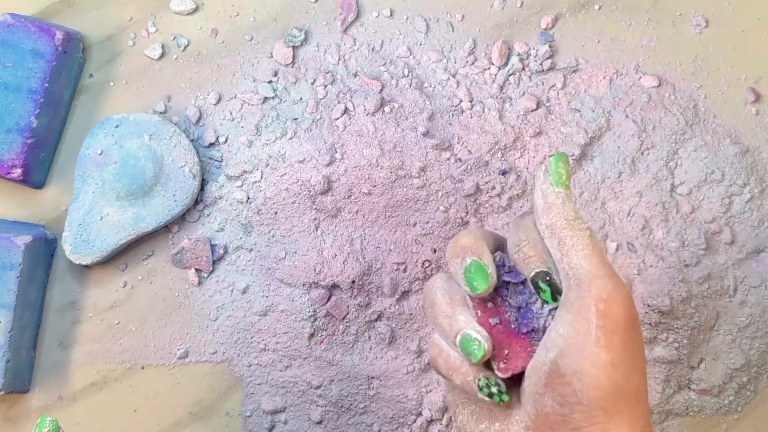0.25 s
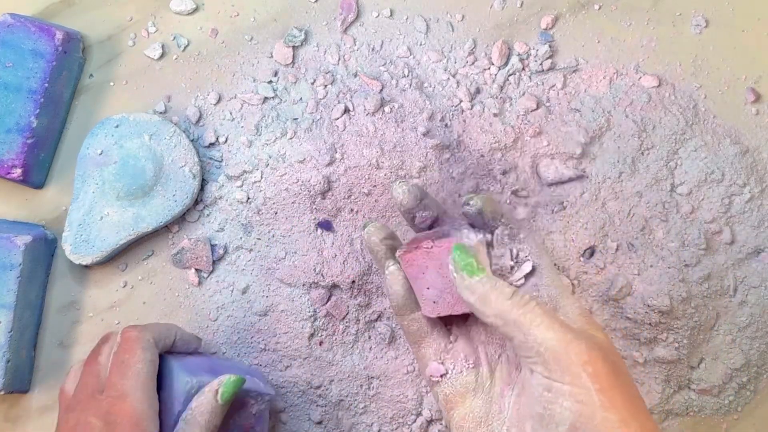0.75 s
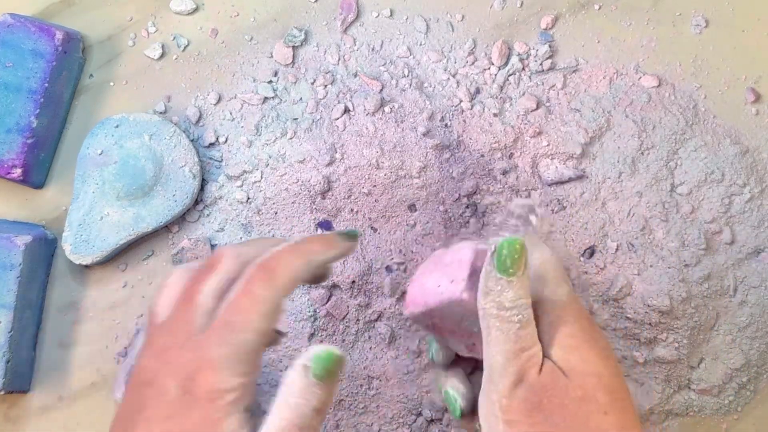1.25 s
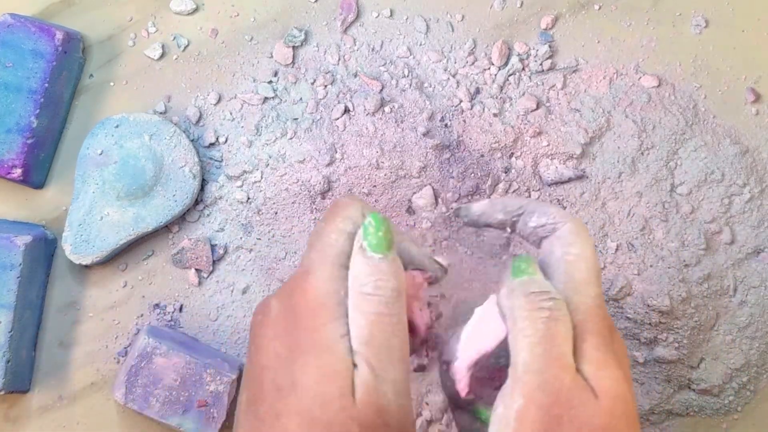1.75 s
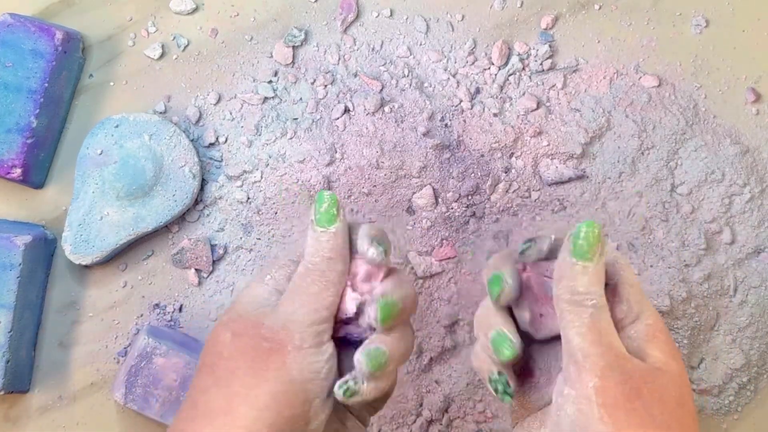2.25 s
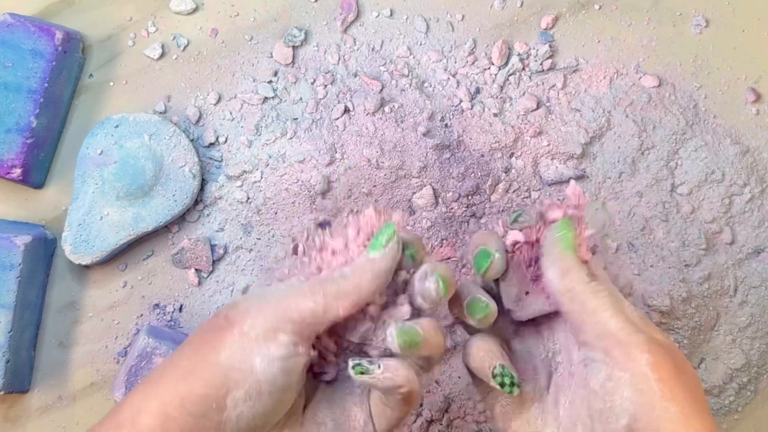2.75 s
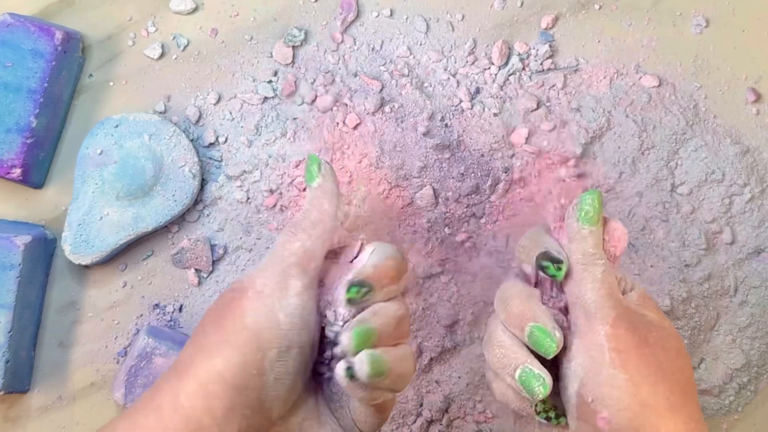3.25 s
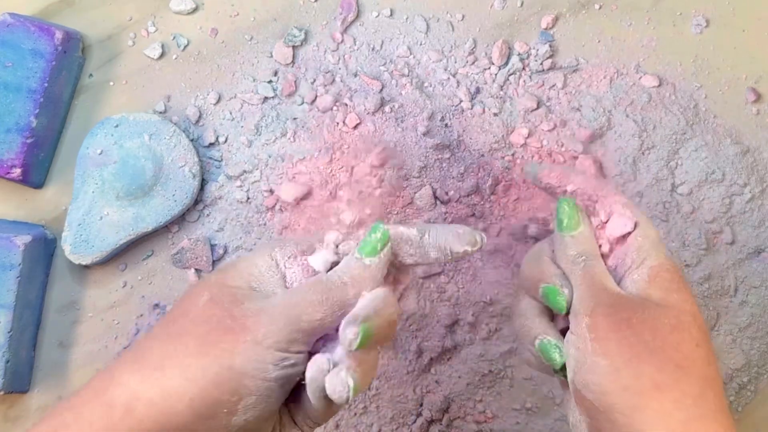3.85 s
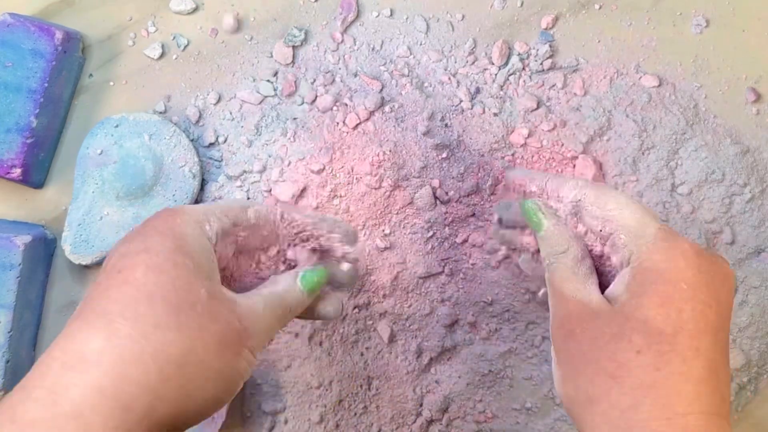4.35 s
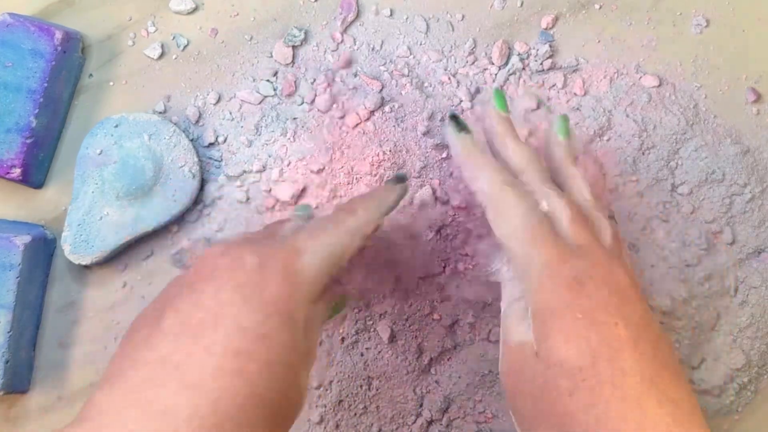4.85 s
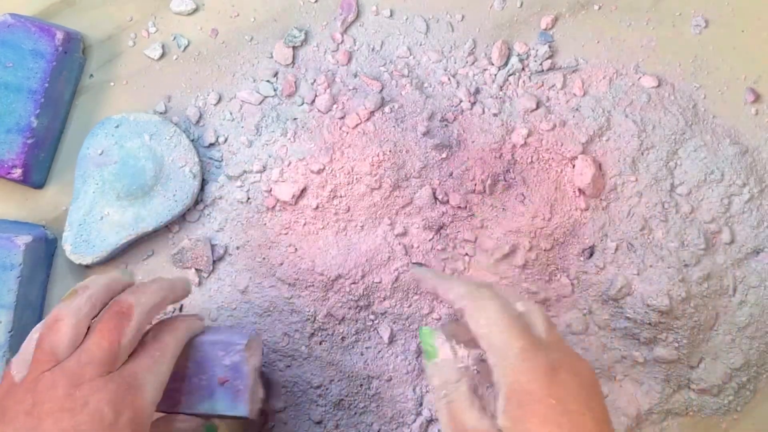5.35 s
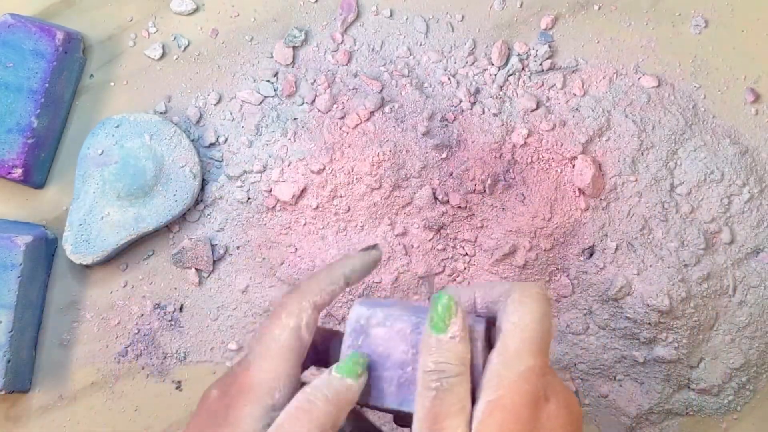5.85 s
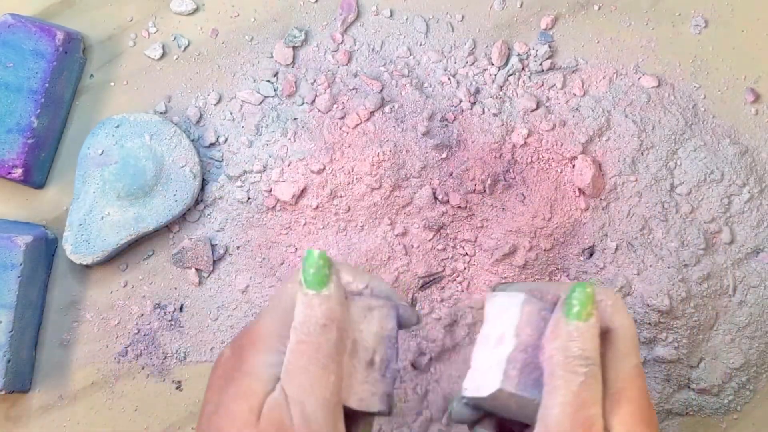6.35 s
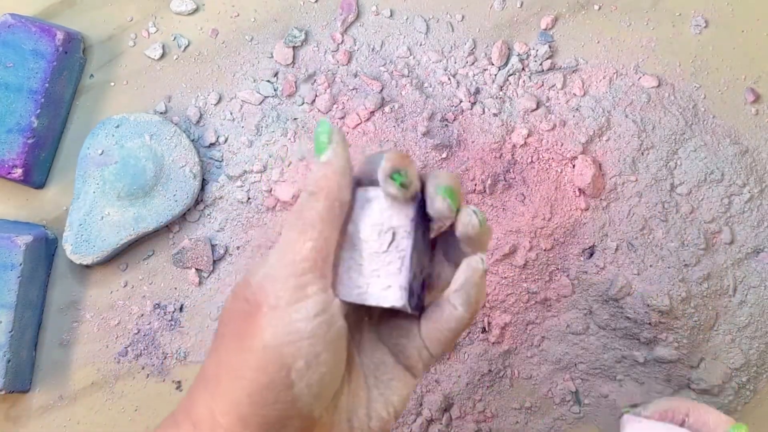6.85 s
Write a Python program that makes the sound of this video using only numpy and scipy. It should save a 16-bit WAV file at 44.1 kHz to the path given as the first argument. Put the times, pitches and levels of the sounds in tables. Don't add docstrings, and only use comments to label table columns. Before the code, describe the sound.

Close, dry stereo sound of hands crushing chalk over powder on a thin wooden table. At the very start a grip crackles briefly, then sparse ticks and soft sifting; a lump snaps near 0.7 s with small table knocks and a faint drag. Around 1.1 s a block drops, bounces in a quick rattle and scrapes briefly. From 1.7 s hard snaps burst out, then dense crunching clusters at 2.3-2.5 and 2.9-3.2 s, with gritty hiss and hollow knocks. Strong cracks continue from 3.5 to 4.0 s, thinning into fine pops and ticks until 5 s. Fresh blocks tap and squeak at 5.2-5.8 s, with small chips near 6.1 s. At 6.2 s one splits with a loud, bright, woody crack; soft slides and powdery crumbling follow, ending in a crisp crunch at 7 s. Quiet room noise, low hum and faint high whine persist.

```python
import sys
import numpy as np
from scipy import signal
from scipy.fft import rfft, irfft, next_fast_len
from scipy.io import wavfile
from scipy.ndimage import uniform_filter1d

SR = 44100
rng = np.random.default_rng(int(sys.argv[2]) if len(sys.argv) > 2 else 0)


def inscribe(sig):
    pcm = np.round(np.clip(np.atleast_2d(sig).T, -1, 1) * 32767)
    wavfile.write(sys.argv[1], SR, pcm.astype(np.int16))


def voltage_ratio(level):
    return 10 ** (np.asarray(level, float) / 20)


N = 313110

# start in seconds, peak in dB, lump pitch in Hz, treble in dB,
# knock into the table in dB.
SNAPS = [(.67, -2, 1370, -52, -34), (1.698, -0.5, 2320, -36.5, -20), (1.702, 5, 1960, -19.5, -30),
         (1.711, 3, 2780, -12, -32), (1.807, 3, 3030, -6.5, -16.5), (1.998, -3, 2580, -13.5, -21),
         (2.275, 0.5, 2730, -25, -39), (2.2805, 2, 2200, -13.5, -28), (2.2854, 4.5, 1260, -20, -45),
         (2.344, 1.5, 2600, -17, -22.5), (2.414, 6.5, 1370, -17.5, -43), (2.48, -0.5, 1900, -37, -45),
         (2.85, 0, 2820, -38, -13.5), (2.956, 0.5, 2420, -20.5, -28), (2.96, -3, 2600, -26, -36),
         (3.141, 1.5, 2950, -51, -18), (3.305, -6, 3280, -40, -22), (3.557, 1, 2900, -11, -24),
         (3.561, -1.5, 3000, -2, -24), (3.603, 4, 1520, -28, -1), (3.811, 4, 4200, -36, -23.5),
         (4.0147, -2.5, 2900, -15.5, -16), (4.56, 3, 2770, -4, -41), (6.218, -2.5, 1490, 12, -7)]
# start in seconds, peak in dB, lump pitch in Hz, treble in dB, knock in dB.
CRACKS = [(.001, -19, 2400, -16, -46), (0.013, -2, 2470, -10.5, -29), (0.728, -12.5, 3100, -20, -53),
          (1.131, -9.5, 5260, -31, 9), (1.646, -8, 1810, -27.5, -9.5), (1.689, -8.5, 2900, -16, -16),
          (2.224, -5, 2880, -15, -18), (2.25, -6, 3000, -11, -26), (2.306, -6.5, 1620, -36, -36),
          (2.4019, -3.5, 1400, -56, -41), (2.906, -10.5, 2880, -23, -8), (2.937, -9.5, 1480, -19.5, -28),
          (2.988, -9, 2170, -23, -13), (3.147, -3.5, 4540, 9, -10.5), (3.19, -13, 1263, -20, -25),
          (3.383, -17, 4570, -19, -39), (3.452, -5, 2220, -8, -19), (3.654, -4.5, 1650, -47, -21),
          (3.682, -17, 1550, -39, -1), (3.718, -9, 2270, -35, -42), (3.728, -5, 4260, -17, -21),
          (3.757, -5.5, 3500, -32, -17.5), (3.804, 1, 1560, -12.5, -26), (3.977, -11.5, 3380, -42, -6.5),
          (4.153, -17.5, 1580, -27, -4), (4.728, -9, 2470, -15.5, -15), (4.79, -10, 1500, -32, -9),
          (5.926, -6.5, 1670, -23, -16.5), (6.231, -9, 880, -21, -37), (7.0427, -4.5, 3260, -12.5, -37)]
# start in seconds, peak in dB, lump pitch in Hz.
POPS = [(.016, -15, 2820), (.049, -14, 2240), (.187, -14, 5340), (.221, -19.5, 2820), (0.568, -31, 2200),
        (.904, -18, 3340), (1.185, -19, 2900), (1.243, -12, 2710), (1.392, -19, 2600), (1.442, -19.5, 2720),
        (2.148, -14.5, 3200), (2.282, -7, 2450), (2.921, -10, 1300), (3.031, -19, 2980), (3.866, -9, 4140),
        (3.878, -12, 3200), (4.115, -12.5, 2420), (4.162, -12, 2700), (4.424, -20, 2490), (4.46, -12, 4600),
        (4.514, -10, 2980), (4.55, -12, 2900), (4.591, -6, 2600), (4.786, -9, 2500), (4.826, -8.5, 5000),
        (4.902, -14, 2350), (4.916, -7, 5900), (4.937, -11, 5800), (4.977, -16, 2600)]
# start in seconds, peak in dB, lump pitch in Hz.
CHIPS = [(1.04, -19, 2860), (1.0575, -29, 1880), (1.342, -23, 1630), (1.375, -20.5, 2830),
         (1.509, -23.5, 2400), (3.326, -11, 2850), (5.605, -13, 5000), (5.7145, -6, 4900),
         (5.72, -18, 5200), (6.086, -13, 4970), (6.106, -22, 2970), (6.169, -20, 4940), (6.766, -20, 2760),
         (6.986, -17.5, 2600), (7.027, -14, 3570), (7.076, -10.5, 3300), (7.095, -11, 3640)]
# start in seconds, peak in dB, lump pitch in Hz.
TICKS = [(0.2044, -15, 3130), (0.2754, -27.5, 1800), (0.4044, -24, 2910), (0.5774, -23, 2800),
         (0.8054, -13, 4590), (1.0877, -16, 1460), (1.635, -20, 2010), (1.8622, -30, 2250),
         (1.9944, -7, 2360), (2.1622, -20.5, 2500), (2.6472, -32, 2810), (2.7551, -25, 2780),
         (3.0077, -10.5, 1440), (3.0545, -17, 1440), (3.2368, -19, 2710), (3.277, -17, 3100),
         (3.5014, -28, 1730), (3.8716, -15, 2030), (3.9583, -16, 3400), (4.2, -16.5, 3380),
         (4.2344, -18.5, 3300), (4.3211, -20.5, 4560), (4.334, -25, 2430), (4.3485, -30, 2470),
         (4.3869, -20, 3780), (4.401, -15, 5540), (4.4159, -11, 2700), (4.4714, -12, 5870),
         (4.488, -13, 3600), (4.6509, -18.5, 2540), (4.6952, -18, 3800), (4.7653, -11.5, 2520),
         (4.8846, -18.5, 1850), (4.989, -20, 2850), (5.5693, -22, 3470), (5.9783, -26, 5700),
         (6.0008, -22, 5410), (6.1513, -21, 2870), (6.4485, -25, 2390), (6.5538, -24, 2050),
         (.1815, -12.5, 5500), (.5701, -14, 2600), (.598, -18, 3000), (.63, -24, 2360), (1.348, -18, 2800),
         (1.0799, -22, 5320), (3.205, -28, 2700), (3.317, -22, 3000), (3.344, -18, 4500), (3.51, -20, 2520),
         (3.95, -20, 5000), (2.688, -23, 3000), (6.955, -17, 4500), (6.966, -18, 2600), (6.9785, -22, 3900),
         (7.017, -18, 4500)]
RELEASE = [5.9, 3.94, 6.2, 4.5, 9]
POP_TREBLE_DB, POP_KNOCK_DB = -20.5, -35.5
CHIP_TREBLE_DB, CHIP_KNOCK_DB = -20, -37
TICK_TREBLE_DB, TICK_KNOCK_DB = -26.5, -45

# hardest moment in seconds, let-go time in seconds, crumbling in dB,
# fine dust in dB, table shaking in dB.
SQUEEZES = [(0, 0.058, -30, -36.5, -43), (.21, 0.038, -42, -63, -24), (.4, 0.12, -40.5, -49, -41),
            (.55, 0.99, -35.5, -44, -39), (.46, 0.25, -43, -36, -59), (.7, 0.28, -58, -33, -24.5),
            (.92, 0.043, -61, -52, -29.5), (1.12, 0.084, -33, -32.5, -17.5), (1.3, 0.25, -35.5, -36, -51),
            (1.7, 0.15, -30, -40, -31), (1.9, 0.27, -41, -38, -46), (2.08, 0.42, -41, -52, -56),
            (2.3, 0.18, -24.5, -32, -31), (2.42, 0.048, -25, -40, -23), (2.52, 0.097, -29, -32, -30),
            (2.6, 0.047, -35, -42, -32), (2.75, 0.13, -36, -41, -33.5), (2.88, 0.079, -30, -34.5, -27),
            (2.97, 0.067, -24, -31.5, -22), (3.06, 0.065, -26, -34, -23.5), (3.16, 0.11, -27, -31, -27.5),
            (3.27, 1, -38.5, -48, -39.5), (3.63, 0.056, -24, -32.5, -42), (3.74, 0.13, -25.5, -41, -46),
            (3.83, 0.25, -28.5, -33, -27.5), (4.05, 0.11, -35, -50, -37), (4.18, 0.16, -36, -53, -55),
            (4.32, 0.17, -35, -47, -40), (4.46, 0.31, -34, -41.5, -52), (4.57, 0.061, -43, -60, -29.5),
            (4.75, 0.17, -33.5, -36, -51), (4.82, 0.12, -36, -42, -31), (4.9, 0.17, -37.5, -38.5, -37)]
# hardest moment in seconds, let-go time in seconds,
# crumbling in dB, fine dust in dB, table shaking in dB.
HANDLING = [(5.26, 0.065, -67, -72, -28), (5.579, 0.027, -63, -54, -42), (5.73, 0.25, -51, -52, -43),
            (5.945, .06, -58, -59, -29), (6.06, 0.2, -48, -58, -61), (6.231, 0.17, -62, -44.5, -33),
            (6.5, 0.2, -43.5, -39, -70), (6.56, 0.12, -43.5, -45, -66), (6.68, 0.081, -35.5, -39, -67),
            (6.802, 0.075, -35, -30.5, -60), (6.87, 0.084, -37.5, -41.5, -64),
            (7.034, 0.059, -28.5, -35, -29.5)]
LET_GO_DB = 10.5
GRAIN_HZ = [1200, 1630, 2200, 2900, 4470, 5200]
DUST_HZ = [4200, 5420, 8000, 9200, 12200, 15000]
# frequency in Hz, level in dB.
CRUMBS = [(300, -3.5), (800, -9), (1500, -1.5), (2100, -3), (2800, 3.5), (3500, -0.5), (4800, -5),
          (7000, -7.5), (10000, -23)]
# frequency in Hz, level in dB.
DUST = [(1500, 8), (3500, 5), (5000, 3.5), (7500, 4.5), (10000, 0), (13000, -5.5), (16000, 7.5)]

# start in seconds, length in seconds,
# level in dB, pitch in Hz.
CRUNCHES = [(0.008, .006, -22, 2740), (0.191, 0.02, -42, 3100), (0.339, 0.037, -40.5, 3700),
            (0.381, 0.034, -37.5, 2750), (0.46, 0.013, -34, 5600), (0.63, 0.065, -37, 2240),
            (2.532, 0.05, -30, 2070), (2.571, 0.072, -32.5, 1600), (2.659, 0.11, -35, 2900),
            (3.385, 0.032, -29.5, 4340), (3.648, 0.031, -28, 1480), (3.683, 0.38, -41.5, 676),
            (3.818, .03, -24.5, 4300), (4.092, .05, -40, 2510), (5.273, 0.02, -34, 650),
            (5.925, 0.048, -41.5, 1400), (2.255, .02, -44.5, 3000), (7.002, .03, -33, 3800),
            (7.034, 0.01, -32.5, 3040)]
GIVE_S, POCKET_WIDTH = 0.0073, 0.46

# mode in Hz, width in Hz, level in dB.
BREAK = [(318, 530, 3.5), (750, 270, -1), (1560, 110, 0.5), (1960, 270, -8)]
BREAK_S, BREAK_DB = 6.221, -13.5

# fastest moment in seconds, stroke length in seconds, level in dB.
STROKES = [(1.134, 0.012, -19.5), (5.238, 0.026, -39.5), (5.281, 0.018, -28.5), (5.597, 0.051, -26.5),
           (5.685, 0.052, -29.5), (5.72, 0.017, -19), (5.74, 0.024, -20.5), (5.78, 0.022, -37.5),
           (5.985, 0.017, -39), (6.03, 0.046, -35), (6.09, 0.049, -37.5), (6.769, 0.0084, -25),
           (6.82, 0.058, -35)]
# fastest moment in seconds, stroke length in seconds, level in dB.
SLIDES = [
    (1.555, 0.019, -32),
    (6.5, 0.017, -31.5),
]
# fastest moment in seconds, stroke length in seconds, level in dB.
DRAGS = [(0.87, 0.13, -36.5), (0.61, 0.015, -40), (4.9, 0.031, -29.5), (1.135, 0.016, -51)]
STROKE_DB, SPEED_UP = 12.5, 0.65
# mode in Hz, width in Hz, level in dB.
BLOCK = [(2600, 610, -7), (3530, 110, 2.5), (4060, 480, -7.5), (4570, 130, 5), (5270, 240, 8),
         (5900, 570, -1.5), (6900, 600, -0.5), (8320, 2000, 2), (10740, 1700, 1), (14900, 1400, -10)]
# mode in Hz, width in Hz, level in dB.
FACE = [(3500, 220, -5), (7740, 1200, -6.5)]
# mode in Hz, width in Hz, level in dB.
SOLE = [(4570, 150, 13), (5500, 100, 15), (6750, 100, -10), (7050, 90, 6), (8800, 85, 0),
        (5030, 4400, -10.5)]

# mode in Hz, width in Hz, level in dB.
TABLE = [(48, 25, -10), (148, 28, -6), (298, 22, 0), (358, 36, -7.5), (415, 45, -13), (560, 45, -22),
         (765, 50, -24)]
# mode in Hz, width in Hz, level in dB.
EDGE = [(352.4, 35, -2), (406, 37, -7), (552, 56, -14.5), (750, 200, -24)]
# start in seconds, peak in dB, deep share in dB.
THUDS = [(0.743, -11.5, 1), (0.761, -16, 7.5), (0.882, -21, -6), (1.098, -11, -20), (1.108, -1.5, -5),
         (1.114, -12, 11.5), (1.127, -9, -31), (1.138, -9, -38), (1.153, -7, -36), (1.162, -10, 6),
         (1.182, -20, 8), (1.226, -30.5, 18), (1.378, -24.5, -20), (1.404, -28, -30), (3.614, -22, -30),
         (3.631, -15, -35), (4.801, -23, -30), (4.828, -25, -28), (5.233, -23, -23), (5.27, -18.5, -36),
         (5.285, -13.5, -23), (5.852, -34, 12)]
# start in seconds, peak in dB.
DROPS = [(0.746, -17), (1.105, -6), (1.135, -6), (1.809, -13.5), (2.854, -17), (2.922, -16), (2.94, -31),
         (2.962, -12), (3.148, -13), (3.606, -21), (3.655, -16.5), (3.686, -22), (3.81, -19), (3.878, -26),
         (4.019, -19), (4.16, -20.5), (4.56, -25), (5.272, -17), (5.287, -20), (6.225, -10)]
# start in seconds, peak in dB.
THUMPS = [(0.669, -21.5), (1.692, -21.5), (1.811, -28), (1.997, -30.5), (2.28, -21.5), (2.4148, -12.5),
          (2.483, -29), (2.85, -31), (3.143, -24), (5.927, -22), (6.2209, -12.5), (7.042, -24.5)]
THUMP_HZ, THUMP_FALL_S, THUMP_S = 560, .002, .004

# frequency in Hz, gap in radians.
PORTS = [(1000, 0), (3000, .15), (5600, .6), (6600, 1.05), (9400, 2.2), (11500, 3.05), (13500, 3.35),
         (15500, 4.5)]
RIGHT_DB = .3
# frequency in Hz, time to fall 60 dB in seconds.
WALLS = [(100, 0.04), (600, 0.15), (1500, 0.21), (4000, 0.079), (12000, 0.0093)]
# frequency in Hz, level in dB.
WALL_COLOUR = [(100, -57), (400, -11.5), (900, -11), (1500, -17.5), (3000, -22), (12000, 1.5)]
# frequency in Hz, level in dB.
AIR = [(25, -29), (45, 9.5), (80, 4.5), (125, 2.5), (200, 4), (600, -11), (900, -40), (2000, -21),
       (5000, -75), (10000, -40), (16000, -39)]
AIR_DB, WHINE_HZ, WHINE_DB = -48, 4500, -62.5
# centre in Hz, width in Hz, level in dB.
HUM = [(46, 16, -4.5), (117, 9.9, 2)]


def snaps():
    s, peak_db, hz, treble_db, knock_db, release = np.transpose(lumps())[..., None]
    t, f = np.arange(2048) / SR, np.fft.rfftfreq(4096, 1 / SR)
    ragged = rng.standard_normal((len(s), 2048, 2))
    swing_db = 1.57 * uniform_filter1d(ragged[..., 1], size=12, axis=1) * np.sqrt(12)
    shower = ragged[..., 0] * voltage_ratio(swing_db)
    late = t - .0015
    crest = np.where(late < 0, np.exp(late / 0.00087), voltage_ratio(-60 * late / 0.011))
    fragments = 0.15 * (late > 0) * voltage_ratio(-60 * late / 0.088)
    drive = shower * (crest + fragments)
    drive[:, 66] += release[:, 0]
    lump = 1 / (1 + 1.2j * (f / hz - hz / (f + 1))) / (1 + .35j * f / hz) ** 2
    rise = (f / 3500) ** 2 / (1 + (f / 3500) ** 2)
    bright = voltage_ratio(treble_db + 8.0) * rise / np.sqrt(1 + (f / 10500) ** 4)
    crack = irfft(rfft(drive, 4096) * (lump + bright), 4096)[:, :2048]
    crack /= abs(crack).max(axis=1, keepdims=True)
    at = np.round(s * SR).astype(int)
    hand = np.arange(len(s))[:, None] % 2
    out, push = np.zeros((2, N + 2048)), np.zeros(N + 2048)
    np.add.at(out, (hand, at + np.arange(2048)), voltage_ratio(peak_db - 1.73) * crack)
    np.add.at(push, at[:, 0] + 66, voltage_ratio(peak_db + knock_db)[:, 0])
    return out[:, :N], push[:N]


def lumps():
    rows = [tuple(row) + (RELEASE[0],) for row in SNAPS]
    rows += [tuple(row) + (RELEASE[1],) for row in CRACKS]
    rows += [tuple(row) + (POP_TREBLE_DB, POP_KNOCK_DB, RELEASE[2]) for row in POPS]
    rows += [tuple(row) + (CHIP_TREBLE_DB, CHIP_KNOCK_DB, RELEASE[3]) for row in CHIPS]
    rows += [tuple(row) + (TICK_TREBLE_DB, TICK_KNOCK_DB, RELEASE[4]) for row in TICKS]
    return rows


def crumbling():
    crumbs_db = grip(layer=0)
    effort = np.clip((crumbs_db + 51) / 14, .15, 1)
    clumps_db = 1.5 * effort * np.minimum(flicker(size=300), 1.5)
    coarse = sifted(GRAIN_HZ, per_s=300, spread_db=3.2, fade_s=0.0005, hiss=0.9, drift_db=2.2)
    fine = sifted(DUST_HZ, per_s=560, spread_db=4.6, fade_s=0.0006, hiss=1.1, drift_db=2.0)
    coarse = evened(coloured(coarse, CRUMBS)) * voltage_ratio(crumbs_db + clumps_db - 3.9)
    fine = evened(coloured(fine, DUST)) * voltage_ratio(grip(layer=1) + clumps_db)
    return coarse + fine


def sifted(pitches, per_s, spread_db, fade_s, hiss, drift_db):
    out = np.zeros(N)
    for hz in pitches:
        size = ring(grains(per_s, spread_db, fade_s, hiss), [(hz, 0.4 * hz, 0)])
        out += size * voltage_ratio(drift_db * flicker(size=2500)) / np.sqrt(hz)
    return out


def grains(per_s, spread_db, fade_s, hiss):
    chance = rng.random(N) * SR / per_s
    size = np.maximum(chance, .12) ** (-spread_db / 4.9) * (chance < 1)
    bursts = signal.lfilter([1], [1, -np.exp(-1 / (fade_s * SR))], size)
    return (hiss + evened(uniform_filter1d(bursts, size=16))) * rng.standard_normal(N)


def grip(layer):
    clench_s = [0.075, 0.052, 0.041][layer]
    rest_db = [-56, -54.5, -61][layer]
    return swells(SQUEEZES + HANDLING, 2 + layer, LET_GO_DB, rise_s=clench_s, rest_db=rest_db)


def crunches():
    grit = evened(grains(per_s=1200, spread_db=2.0, fade_s=0.00088, hiss=0.93))
    out = np.zeros(N)
    for s, length, level_db, hz in CRUNCHES:
        t = np.arange(-4 * GIVE_S, 3 * length, 1 / SR)
        t = t[max(round((4 * GIVE_S - s) * SR) + 1, 0):]
        at = round((s + t[0]) * SR)
        shape = voltage_ratio(level_db - LET_GO_DB * (t / np.where(t < 0, GIVE_S, length)) ** 2)
        pocket = ring(grit[at:at + len(t)], [(hz, POCKET_WIDTH * hz, 0)])
        out[at:at + len(t)] += shape * evened(pocket)
    return out


def split():
    t = np.arange(N) / SR - BREAK_S
    fade = (t > 0) * (voltage_ratio(-5 - 60 * abs(t) / 0.07) + voltage_ratio(-6 - 60 * abs(t) / .28))
    strike = 1. * (np.arange(N) == round(BREAK_S * SR))
    blow = voltage_ratio(30.0) * ring(strike, BREAK[1:])
    shaken = evened(ring(rng.standard_normal(N), BREAK))
    return blow + voltage_ratio(BREAK_DB) * shaken * fade / 2


def rubbing():
    friction = grains(per_s=2600, spread_db=0.56, fade_s=0.001, hiss=1.3) * voltage_ratio(flicker(size=150))
    squeak = np.zeros(N)
    for k, mode in enumerate(BLOCK):
        squeak += (-1) ** k * ring(friction, [mode]) * voltage_ratio(2.2 * flicker(size=900))
    hard = evened(squeak) * strokes(STROKES)
    soft = evened(ring(friction, FACE)) * strokes(SLIDES)
    dragged = evened(ring(friction, SOLE)) * strokes(DRAGS)
    return hard + soft + dragged


def strokes(rows):
    return voltage_ratio(swells(rows, column=2, fall_db=STROKE_DB, rise_share=SPEED_UP))


def table(push):
    crumbs = grains(per_s=190, spread_db=1.7, fade_s=0.0018, hiss=0.76)
    patter = np.zeros(N)
    for k, (hz, width, db) in enumerate(TABLE[:3] + EDGE):
        patter += (-1) ** k * ring(crumbs, [(hz, 2 * width, db)]) * voltage_ratio(3.4 * flicker(size=2500))
    patter = evened(patter) * voltage_ratio(grip(layer=2) - 8.5)
    s, peak_db, deep_db = np.transpose(THUDS)
    bounce = hits(s, peak_db)
    deep = hits(s, peak_db + deep_db)
    knocks = voltage_ratio(17.5) * ring(push + voltage_ratio(2.5) * bounce, TABLE[2:])
    rings = knocks + voltage_ratio(18.0) * ring(deep, TABLE[:2]) + drops()
    contact = signal.windows.hann(44)
    return patter + signal.oaconvolve(rings, contact)[:N] + thumps()


def drops():
    return voltage_ratio(18.5) * ring(hits(*np.transpose(DROPS)), EDGE)


def thumps():
    t = np.arange(1024) / SR
    turns = np.cumsum(190 + THUMP_HZ * np.exp(-t / THUMP_FALL_S)) / SR
    swing = np.sin(2 * np.pi * turns) * t / THUMP_S * np.exp(1 - t / THUMP_S)
    return signal.oaconvolve(hits(*np.transpose(THUMPS)), swing)[:N]


def ports(x, lean):
    size = next_fast_len(N)
    half = np.exp(.5j * lean * read(PORTS, np.fft.rfftfreq(size, 1 / SR)))
    return irfft(rfft(x, size) * np.array([half / voltage_ratio(RIGHT_DB), 1 / half]), size)[:, :N]


def room(x):
    hz, t, z = signal.stft(rng.standard_normal((2, SR // 2)), SR, nperseg=256)
    fade = voltage_ratio(-60 * t / read(WALLS, hz)[:, None])
    tail = signal.istft(z * fade, SR, nperseg=256)[1]
    tail[:, :100] = 0
    tail /= np.linalg.norm(tail[0])
    return signal.fftconvolve(coloured(x, WALL_COLOUR)[None], tail, axes=1)[:, :N]


def air():
    shared = evened(coloured(rng.standard_normal(N), AIR)) * voltage_ratio(AIR_DB + 2.76 * flicker(size=3000))
    own_colour = [(40, -24), (150, -7.5), (400, -5), (1000, -11.5), (1600, -11.0),
                  (5000, -25.0), (16000, -25.0)]
    own = coloured(rng.standard_normal((2, N)), own_colour)
    whine = voltage_ratio(WHINE_DB) * np.sqrt(2) * np.sin(2 * np.pi * WHINE_HZ * np.arange(N) / SR)
    hum = voltage_ratio(-49.5) * evened(ring(rng.standard_normal(N), HUM))
    return shared + hum + whine, voltage_ratio(-47.5) * evened(own)


def swells(rows, column, fall_db, rise_s=0, rise_share=0, rest_db=-120):
    rows, t = np.array(rows), np.arange(0, N + 64, 64) / SR
    late, length = t - rows[:, :1], rows[:, 1:2]
    u = late / np.where(late < 0, rise_s + rise_share * length, length)
    gesture_db = np.maximum(rows[:, column:column + 1] - fall_db * u ** 2, -150)
    power = voltage_ratio(2 * rest_db) + voltage_ratio(2 * gesture_db).sum(axis=0)
    return np.interp(np.arange(N) / SR, t, 10 * np.log10(power))


def hits(s, peak_db):
    out = np.zeros(N)
    out[np.round(s * SR).astype(int)] = voltage_ratio(peak_db)
    return out


def ring(x, modes):
    out = np.zeros(len(x))
    for k, (hz, width, db) in enumerate(modes):
        out += (-1) ** k * voltage_ratio(db) * signal.lfilter(*signal.iirpeak(hz, hz / width, SR), x)
    return out


def flicker(size):
    return evened(uniform_filter1d(uniform_filter1d(rng.standard_normal(N), size), size))


def coloured(x, points):
    size = next_fast_len(N)
    gain = voltage_ratio(read(points, np.fft.rfftfreq(size, 1 / SR)))
    return irfft(rfft(x, size) * gain, size)[..., :N]


def read(points, hz):
    f, value = np.transpose(points)
    return np.interp(np.log(hz + 1), np.log(f + 1), value)


def evened(x):
    return x / np.sqrt(np.mean(x ** 2) + 1e-20)


def scene():
    crack, push = snaps()
    shared, own = air()
    one_hand = crack[0] + table(push) + rubbing() + split() + crunches()
    other_hand = crack[1] + crumbling()
    direct = ports(one_hand, lean=1.2) + ports(other_hand + shared, lean=.82)
    return direct + room(one_hand + other_hand) + own


def low_pass(x):
    return signal.sosfilt(signal.butter(12, 16860, fs=SR, output="sos"), x)


def record(dry):
    heard = signal.sosfilt(signal.butter(7, 38, "highpass", fs=SR, output="sos"), dry)
    limited = heard / (1 + (heard / .97) ** 4) ** .25
    return low_pass(limited)


dry = scene()
out = record(dry)
inscribe(out)
```